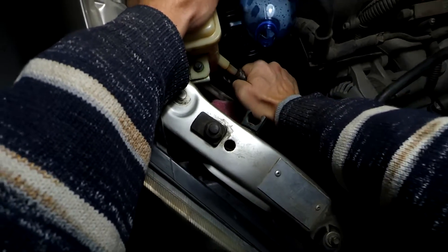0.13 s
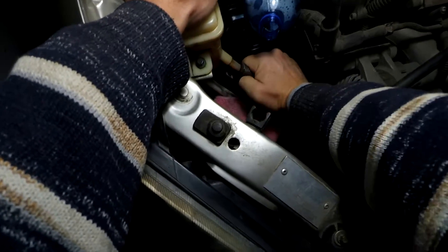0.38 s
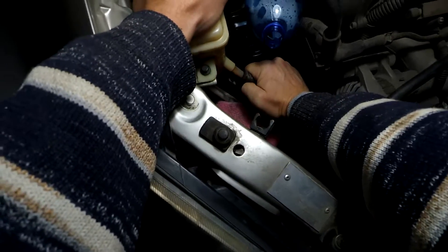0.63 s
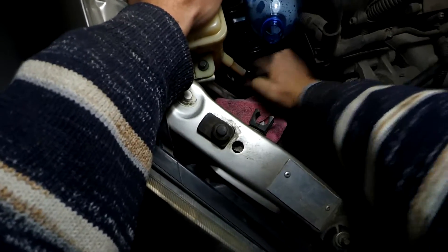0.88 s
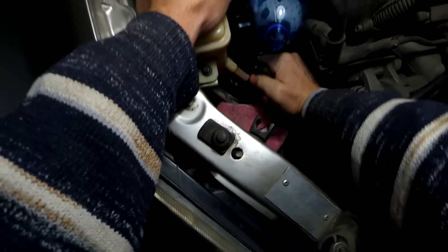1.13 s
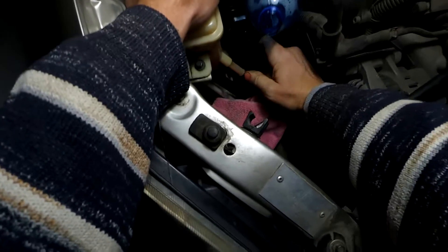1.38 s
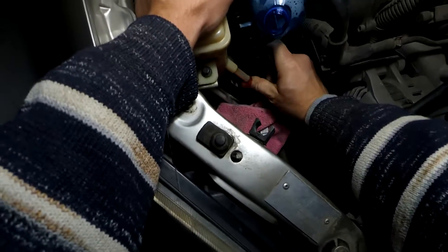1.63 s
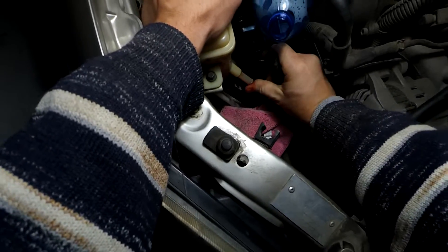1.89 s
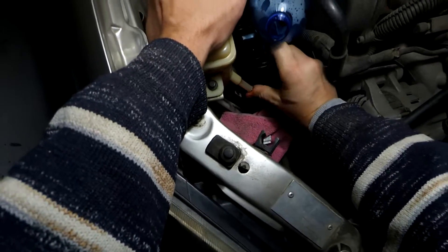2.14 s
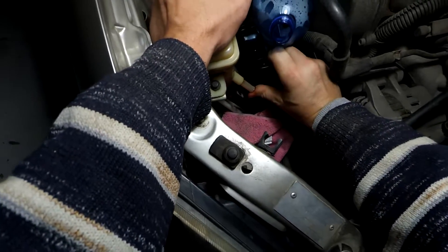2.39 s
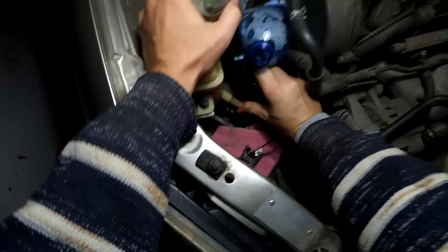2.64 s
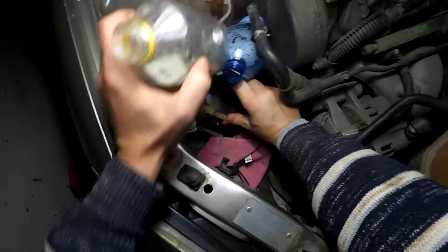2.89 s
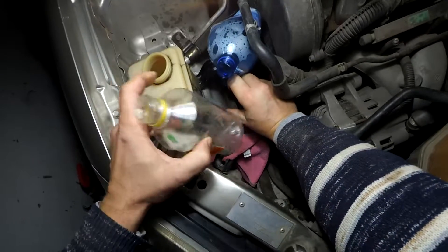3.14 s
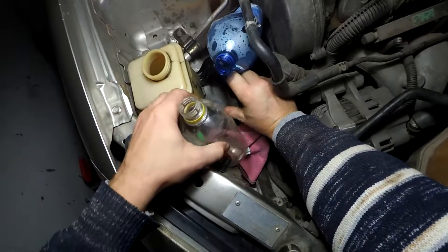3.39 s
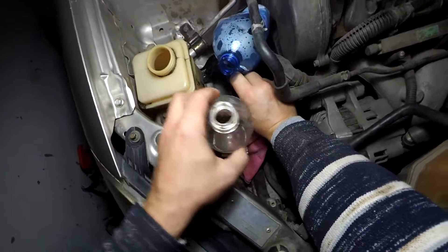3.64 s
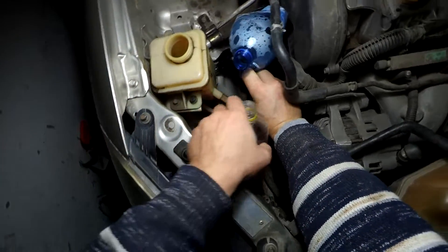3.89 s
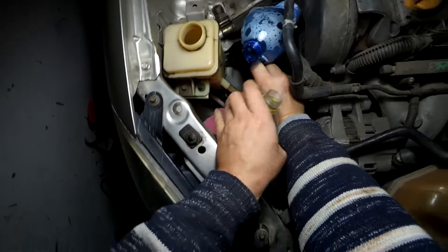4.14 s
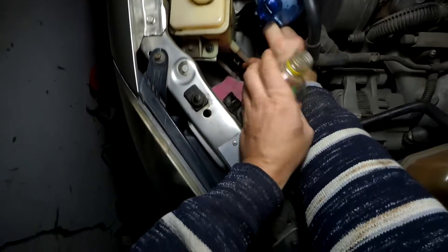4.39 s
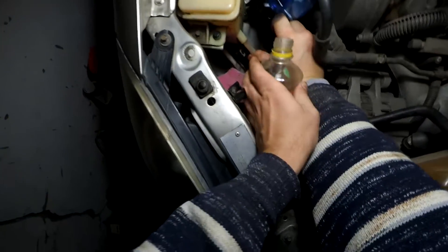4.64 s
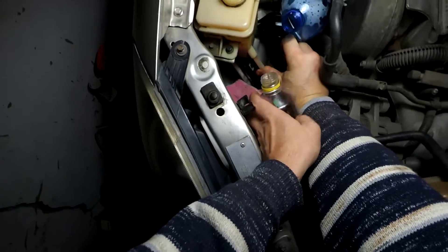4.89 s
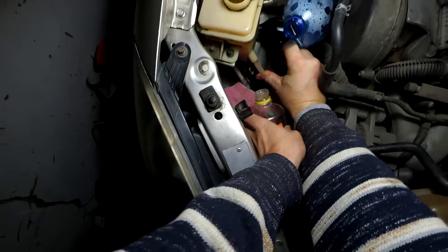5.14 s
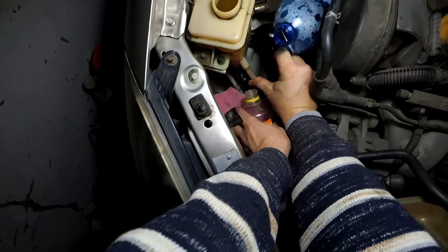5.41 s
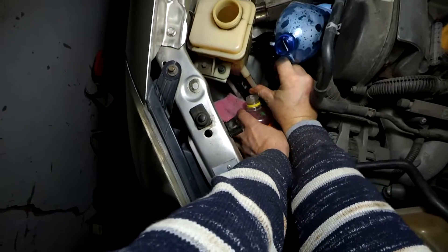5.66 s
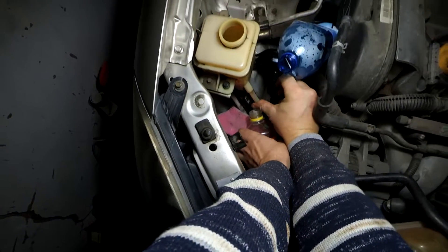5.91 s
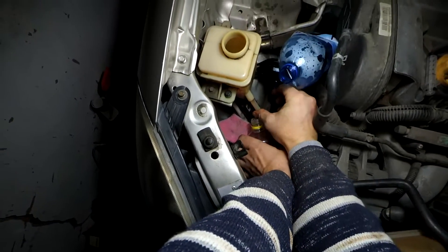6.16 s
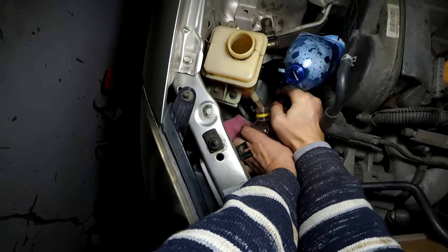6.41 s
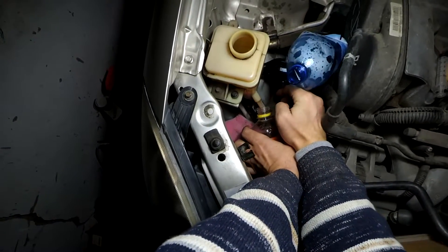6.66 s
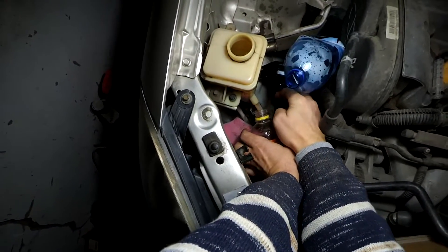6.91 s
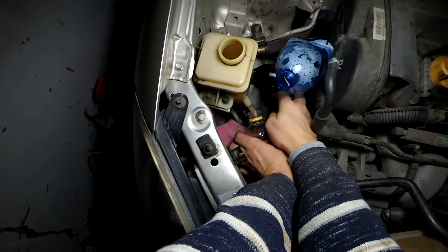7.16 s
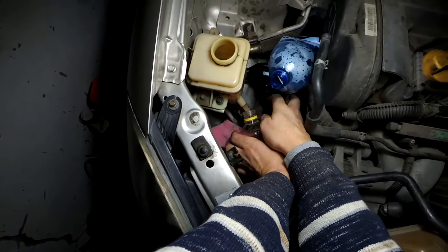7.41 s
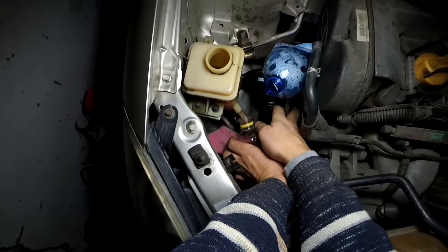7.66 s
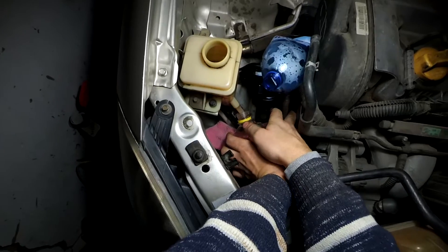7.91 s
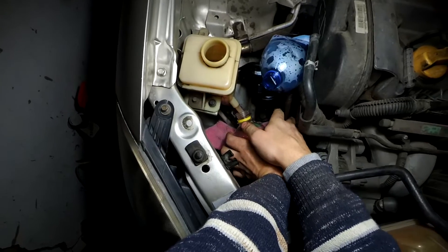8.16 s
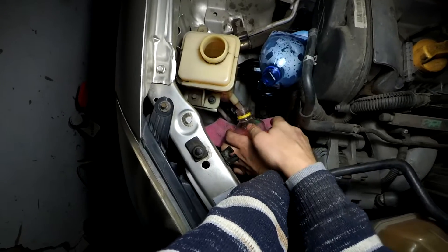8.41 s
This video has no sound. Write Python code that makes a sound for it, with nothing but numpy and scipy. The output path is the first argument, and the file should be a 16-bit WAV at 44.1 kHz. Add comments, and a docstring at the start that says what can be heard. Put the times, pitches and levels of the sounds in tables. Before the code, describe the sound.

Sparse handling noises over soft steady hiss and low camera bumps. First, muffled hand and hose knocks on hollow plastic and bodywork, with a rubbery chirp. Then an empty bottle bumps, its rim striking metal brightly, followed by scratchy wool brushes and small clacks. Wedged among engine parts, the bottle thumps hollowly, one crack standing out. Afterwards quiet taps, thin rubber squeaks and high cricket chirps, all close in a small garage.

```python
"""Knocks, clacks, rustles and squeaks from hands at work in a car's engine bay; a cricket chirps outside.
A rubber hose is pulled and pinched; an empty plastic bottle is pushed down between the parts and knocks on them.
Blows ring decaying modes and noise bands; sleeves, drags and creaks are random slips through resonances.
Squeaks are sliding tones; the cricket, hiss and sway of the body-worn camera are filtered noise."""
import sys
import numpy as np
from scipy import signal
from scipy.fft import rfft, irfft, next_fast_len
from scipy.io import wavfile
from scipy.ndimage import uniform_filter1d

SR = 44100
rng = np.random.default_rng(int(sys.argv[2]) if len(sys.argv) > 2 else 0)


def gain_from_db(level_db):
    """Convert decibel levels to linear amplitude factors (20 dB per decade)."""
    decades = np.asarray(level_db, float) / 20
    return 10 ** decades


def pcm_store(signal):
    """Save signal as 16-bit PCM."""
    levels = np.round(np.clip(np.atleast_2d(signal), -1, 1) * 32767)
    wavfile.write(sys.argv[1], SR, levels.astype(np.int16).T)


N = 376385
TIME = np.arange(N) / SR

# Hiss alike in both channels. Each row: frequency in Hz, relative density in dB per Hz.
HISS_SPECTRUM = [(100, -24), (200, 0.5), (500, -9.5), (1000, -14), (2000, -17.5), (4000, -19), (8000, -20),
                 (13000, -23.5), (16000, -23)]
# Very faint noise of opposite sign left and right. Each row: frequency in Hz, relative density in dB per Hz.
SIDE_NOISE_SPECTRUM = [(35, -28.5), (60, -1.5), (179, -37), (1100, -38), (4420, -37.5), (15500, -39)]

# Cricket chirps. Each entry: start in seconds.
CHIRP_STARTS_S = [6.59, 6.75, 6.9, 7.05, 7.25, 7.43, 7.67, 7.75, 7.92, 8.08, 8.22, 8.38]
# Wing resonances. Each row: frequency in Hz, width in Hz, gain in dB.
WING_RESONANCES = [(7750, 130, 0), (8350, 200, -4)]

# Camera on the moving body. Each row: time in seconds, sway in dB.
CAMERA_SWAY = [(0.0, -43), (0.31, -46.5), (0.43, -35), (0.81, -48), (1.02, -34.5), (1.66, -49.5),
               (2.66, -53), (3.14, -46.5), (3.61, -61), (4.06, -45.5), (5.2, -51.5), (5.37, -36.5),
               (5.561, -53), (6.15, -57), (6.37, -44.5), (6.749, -57), (7.86, -57.5), (8.53, -53.5)]
# The man shifts his weight and jolts the mount. Each row: start in seconds, length in seconds, level in dB.
JOLTS = [(1.0, 0.056, -50.5), (1.3, 0.27, -65.5), (5.3, 0.096, -47.5)]

# Decay of the engine bay and garage. Each row: frequency in Hz, t60 in seconds.
GARAGE_DECAY = [(200, 0.2), (1500, 0.2), (5000, 0.021), (12000, 0.017)]

# Knitted cloth. Each row: frequency in Hz, relative density in dB per Hz.
CLOTH_SPECTRUM = [(700, -23.5), (1200, -8.5), (2000, -6.5), (2700, -4.5), (3500, -3), (5500, -3),
                  (8000, -7.5), (11000, -13), (15500, -22)]
# A sleeve brushes past. Each row: start in seconds, length in seconds, level in dB.
BRUSHES = [(.04, 0.03, -78), (.9, 0.072, -71), (1.05, 0.089, -75.5), (1.37, 0.09, -65.5),
           (1.52, 0.061, -69), (1.78, 0.036, -67), (1.88, 0.044, -70.5), (2.04, 0.16, -67),
           (2.13, 0.035, -69), (2.63, 0.066, -66.5), (2.76, 0.029, -62), (3.09, .04, -76),
           (3.33, 0.074, -63), (3.5, 0.049, -64), (3.63, 0.19, -61), (3.9, 0.078, -63.5),
           (4.05, 0.13, -66.5), (4.275, 0.074, -59.5), (4.36, 0.019, -70), (4.46, 0.084, -59.5),
           (4.6, 0.045, -63), (4.69, 0.11, -58), (4.9, 0.0043, -61), (5.02, 0.053, -54.5),
           (5.14, 0.081, -59), (5.33, 0.098, -67.5), (5.47, 0.16, -64), (5.68, 0.082, -64),
           (5.79, 0.08, -61.5), (6.05, 0.21, -65.5), (6.28, 0.013, -70.5), (6.35, 0.1, -67),
           (6.56, 0.31, -73), (6.92, 0.052, -66), (7.4, 0.2, -72), (7.66, 0.26, -72)]
# Hollow plastic under a drag. Each row: frequency in Hz, width in Hz of one of two passes, relative gain in dB.
RUBBED_RESONANCES = [(226, 150, -1), (327.7, 99, 1), (399, 90, -2.5), (521, 180, -3), (729, 100, -5.5),
                     (1030, 210, -9.5), (1480, 570, -14.5)]
# Fingers or hose drag over a hollow part. Each row: start in seconds, length in seconds, level in dB.
DRAGS = [(.09, 0.097, -73), (.5, 0.013, -69), (1.17, 0.0041, -56.5), (1.35, 0.05, -61), (1.43, 0.032, -57),
         (1.53, 0.024, -63), (1.81, 0.033, -65.5), (2.0, 0.13, -63.5), (2.13, 0.062, -58),
         (2.49, 0.019, -73.5), (2.64, 0.18, -68), (3.38, 0.029, -51), (3.5, 0.12, -61.5),
         (3.71, 0.094, -53.5), (3.86, 0.034, -63), (4.045, 0.039, -61.5), (4.22, 0.11, -62),
         (4.45, 0.031, -64), (4.61, 0.15, -61), (4.78, 0.1, -73), (4.86, 0.034, -51.5), (5.25, 0.14, -64.5),
         (5.53, 0.08, -70.5), (5.66, 0.038, -69), (6.12, 0.09, -65.5), (6.24, 0.33, -62), (6.7, 0.094, -66),
         (6.85, 0.12, -71), (7.15, 0.062, -71), (7.32, 0.088, -70), (7.445, 0.024, -74), (7.61, 0.36, -73)]
# A drag or creak rings one resonance. Each row: start in seconds, length in seconds, frequency in Hz,
# width in Hz of one of two passes, level in dB before gating.
CREAKS = [(0.058, 0.13, 263, 140, -55.5), (0.096, 0.13, 376, 23, -66), (0.1, 0.19, 132.4, 46, -58.5),
          (0.922, .025, 1580, 160, -56), (1.213, 0.034, 4640, 5000, -64.5), (1.217, 0.029, 7000, 340, -68),
          (1.327, 0.29, 440, 150, -62.5), (1.743, 0.096, 1510, 520, -65.5), (2.563, 0.072, 1286, 54, -65),
          (2.639, 0.11, 352, 57, -61.5), (2.89, 0.16, 364, 40, -63), (3.269, 0.0097, 4330, 420, -59),
          (3.37, 0.33, 226, 7.4, -63.5), (3.485, 0.47, 2700, 310, -72), (4.853, .024, 4370, 3800, -54),
          (4.876, 0.022, 8550, 7000, -57), (6.245, 0.087, 1460, 340, -59), (7.87, 0.086, 268.5, 17, -65.5),
          (7.988, 0.09, 277, 47, -67), (8.193, 0.011, 2340, 330, -66), (8.196, 0.0065, 5250, 1200, -66.5)]
# Thin squeaks of rubber that sag. Each row: start in seconds, length in seconds, first Hz, last Hz,
# median peak level in dB.
SQUEAKS = [(1.217, .026, 1650, 1300, -54), (1.238, .034, 1450, 1300, -63), (7.64, .14, 2450, 2300, -77),
           (7.8, .29, 2500, 2250, -76)]

# Heavier blows shake the whole car front. Each row: start in seconds, gain in dB.
THUDS = [(0.976, -40), (2.161, -49), (2.808, -45), (5.976, -48)]
# Lowest bodywork modes. Each row: frequency in Hz, gain in dB, t60 in seconds.
CAR_FRONT_MODES = [(89, 2, 0.32), (132.5, 4.5, 0.096)]

# A nail or hard edge snaps over a rib. Each row: start in seconds, level in dB over the first 20 ms.
SNAPS = [(1.329, -70.5), (2.109, -51.5), (2.596, -62), (2.805, -55), (8.131, -69)]
# Treble band of a snap. Each row: frequency in Hz, width in Hz of one of two passes, gain in dB.
SNAP_BAND = [(8400, 4200, 0)]

# Blows: hand or hose on reservoir and bodywork; bottle shoulder clacking and skidding on a hose clamp;
# bottle's hard rim on sheet metal; bottle on engine parts.
# Each row: start in seconds, then wall, hollow (panel or air cavity), knock and crack levels in dB over 20 ms.
BAY_HITS = [(0.491, -72, -76, -66, -86), (0.821, -98, -61.5, -94, -98), (0.933, -56.5, -62, -46, -57.5),
            (0.975, -50, -42, -34, -50), (1.158, -68.5, -72, -54, -71), (1.345, -67, -64, -68, -88),
            (1.431, -65, -81, -78, -67.5), (1.563, -72, -68.5, -61, -68), (2.11, -67, -61, -58, -65.5),
            (2.297, -95, -72, -65.5, -84), (2.596, -62.5, -89, -77, -67), (2.666, -60, -66.5, -61, -63),
            (8.372, -62, -52.5, -37.5, -69)]
CLAMP_HITS = [(4.042, -54.5, -86, -54, -53), (4.06, -58, -85, -54.5, -71), (4.8745, -44, -46, -44.5, -39),
              (4.884, -55, -57, -53, -46)]
METAL_HITS = [(3.155, -32.5, -45.5, -37, -35.5), (3.176, -55, -59.5, -61, -51.5),
              (3.194, -52.5, -48, -39.5, -46.5), (5.978, -39.5, -46.5, -46, -34.5)]
BOTTLE_HITS = [(2.802, -46, -41, -37.5, -56), (2.811, -101, -63, -52, -57.5), (2.822, -59, -40, -66, -65),
               (2.896, -45, -45, -43.5, -51.5), (3.13, -60, -52.5, -50.5, -55),
               (3.36, -52, -51.5, -55, -59.5), (4.226, -69, -82, -61, -67), (4.276, -57.5, -82, -61, -55),
               (4.352, -66, -75, -67, -55.5), (4.386, -65.5, -68, -86, -60),
               (4.851, -69, -50.5, -51.5, -63), (5.05, -46.5, -28, -38.5, -55),
               (5.711, -36, -37.5, -40, -55.5), (5.805, -40, -43.5, -49, -57.5),
               (5.915, -66.5, -57, -54.5, -85), (6.299, -73, -66, -79, -63.5),
               (6.387, -35, -39, -40.5, -50), (6.441, -31.5, -32, -21.5, -31),
               (6.647, -60.5, -53, -55, -93), (7.152, -71.5, -55, -60.5, -86.5),
               (7.447, -64.5, -57, -62.5, -86)]

# Air in the bottle, choked while it rests on the reservoir or is gripped, lower and more damped as it sinks
# between the parts. Each row: time in seconds, frequency in Hz, t60 in seconds.
BOTTLE_AIR = [(2.83, 178, 0.028), (2.89, 226.7, 0.45), (3.1, 224, 0.055), (4.899, 228, 0.11),
              (5.04, 226, 0.36), (5.702, 222, 0.17), (6.4, 220.6, 0.15), (7.451, 203, 0.18)]
# Low modes. Each row: frequency in Hz, relative gain in dB, t60 in seconds.
BAY_PANEL_MODE = [(185, 0, 0.41)]
BAY_KNOCK = [(272, 0, .15), (350, -1, .13), (450, -10, .08), (603, -13, .08), (950, -17, .05)]
METAL_KNOCK = [(410, -4, .08), (500, -3, .09), (560, -1, .1), (610, 0, .13), (670, 0, .11), (740, -2, .09)]
BOTTLE_KNOCK = [(387, -13, 0.2), (419, -4.5, 0.047), (469, 4, 0.03), (608, -21.5, 0.22)]

# Thin walls have too many modes to tell apart; they crowd in bands, listed for wall, crack and tick.
# Each row: frequency in Hz, width in Hz of one of two passes, relative gain in dB before the passes.
BAY_BANDS = [
    [(840, 280, 0.42), (1266, 2400, 1.78), (2180, 2940, 0.61)],
    [(2700, 1760, -2), (3900, 4140, -0.85), (5560, 3920, -3)],
    [(7240, 18000, 4), (11800, 1100, -3.4)],
]
CLAMP_BANDS = [
    [(790, 440, -1), (1730, 610, -1.3)],
    [(2260, 620, -0.5), (3540, 700, -3.5)],
    [(5800, 3400, 0)],
]
METAL_BANDS = [
    [(900, 400, -2), (1390, 500, 0), (1750, 400, -4)],
    [(2150, 600, 0), (3200, 700, 0), (3950, 700, -3)],
    [(5300, 1400, 0), (8000, 4000, -5), (11000, 5000, -8)],
]
BOTTLE_BANDS = [
    [(784, 180, 5.5), (1456, 520, 8.5), (1100, 830, 3), (2080, 500, -2), (2750, 500, -0.5)],
    [(3280, 5400, 4), (3860, 2200, 8), (5500, 220, -5)],
    [(6760, 2800, -1), (10560, 3200, -21)],
]
# Modes that stand out of the crowd, listed for wall, crack and tick.
# Each row: frequency in Hz, gain in dB over the crowd, t60 in seconds.
BAY_CLEAR = [
    [(1317, -14, 0.033), (1640, -10.5, 0.034)],
    [],
    [],
]
CLAMP_CLEAR = [
    [],
    [(2225, -1, 0.057), (2380, 0, 0.032)],
    [],
]
METAL_CLEAR = [
    [(1000, -2, .07), (1389, 0, .06), (1700, -3, .07)],
    [(2060, 3, .04), (3200, 5, .025), (4100, -4, .03)],
    [(5320, 0, .03)],
]
BOTTLE_CLEAR = [
    [(810, 5.5, 0.06), (923, -1, 0.05), (1228, 0.5, 0.019), (1523, -1.5, 0.034)],
    [(2394, -5.5, 0.021), (3566, 0, 0.024), (4070, -1, 0.02)],
    [],
]
# Two-part decay of wall, crack and tick. Each row: first t60 in seconds, second t60 in seconds,
# second part in dB over the first.
BAY_FADE = [(0.054, 0.51, -19), (0.076, 0.12, -10), (0.0078, 0.069, 4)]
CLAMP_FADE = [(.06, 0.19, -5), (0.024, 0.13, -9), (0.076, .1, -8)]
METAL_FADE = [(0.032, 0.28, -15), (0.051, 0.11, -8), (0.058, 0.13, -17.5)]
BOTTLE_FADE = [(0.09, 0.08, 1.5), (0.014, 0.14, -10), (0.0048, 0.17, -28.5)]
# The tick follows the crack and how hard the wall is hit. Entries: dB over crack, dB per dB of wall over crack.
BAY_TICK = (-1.5, -0.82)
CLAMP_TICK = (-12, .1)
METAL_TICK = (0, 1.83)
BOTTLE_TICK = (-6, -0.37)


def level(x, db):
    """Scale to an rms level."""
    return x * gain_from_db(db) / np.sqrt(np.mean(x ** 2))


def shaped(x, gain):
    """Filter by a gain that is a function of frequency."""
    size = next_fast_len(len(x))
    hz = np.maximum(np.arange(size // 2 + 1) * SR / size, 1)
    return irfft(rfft(x, size) * gain(hz), size)[:len(x)]


def points(table):
    """Gain through (Hz, dB) points."""
    hz, db = np.transpose(table)
    return lambda f: gain_from_db(np.interp(np.log(f), np.log(hz), db, left=-90))


def resonances(table):
    """Gain of (Hz, width Hz, dB) resonances side by side, with alternating sign."""
    return lambda f: sum(gain_from_db(db) * 1j * f * w / (hz ** 2 - f ** 2 + 1j * f * w) * (-1) ** k
                         for k, (hz, w, db) in enumerate(table))


def gate(start_s, length_s, edge_s):
    """Gain that opens and closes smoothly."""
    inside_s = np.minimum(TIME - start_s, start_s + length_s - TIME)
    return np.clip(inside_s / edge_s, 0, 1) ** 2


def grains(per_s, spread_db):
    """Random slips of fibre or skin, most of them small, a few large."""
    happens = rng.random(N) < per_s / SR
    size = gain_from_db(spread_db * rng.exponential(size=N))
    return happens * size * rng.standard_normal(N)


def walk(rate_hz):
    """Smoothed random wander of spread 1, at a given rate."""
    hold = int(SR / rate_hz)
    steps = np.repeat(rng.standard_normal(N // hold + 1), hold)
    return level(uniform_filter1d(steps, hold)[:N], 0)


def strokes(rows, rise_db_per_s, fall_db_per_s):
    """Gain of overlapping movements: each swells up to its start, holds for its length, then fades."""
    s, length_s, db = np.transpose(rows)[:, :, None]
    t = TIME[::64]
    db = db - rise_db_per_s * np.maximum(s - t, 0) - fall_db_per_s * np.maximum(t - s - length_s, 0)
    return np.interp(TIME, t, np.sqrt(np.sum(gain_from_db(db) ** 2, axis=0)))


def patchy(x, bands, patchy_db, rate_hz, order):
    """Contact wanders, so each band swells and fades on its own; a higher order is a steeper resonance."""
    out = 0
    for hz, width_hz, db in bands:
        gain = resonances([(hz, width_hz, 0)])
        band = shaped(x, lambda f: gain(f) ** order)
        out = out + band * gain_from_db(db + patchy_db * walk(rate_hz))
    return level(out, 0)


def ring(modes, t, scatter_db, detune, push_s, rattle_db=0):
    """Decaying modes share each blow's force anew after a soft push; loose contact makes them stutter."""
    hz, db, t60_s = np.transpose(modes)[:, :, None]
    luck = rng.standard_normal((2, len(modes), 1))
    knots = t[::SR // 150]
    stutter = np.array([np.interp(t, knots, rng.standard_normal(len(knots))) for _ in modes])
    stutter = stutter * np.clip(t / .015, 0, 1)
    gain_db = db + scatter_db * luck[0] + rattle_db * stutter - 60 * t / t60_s
    rings = np.sin(2 * np.pi * hz * (1 + detune * luck[1]) * t) * gain_from_db(gain_db)
    return rings.sum(0) * (1 - np.exp(-t / push_s))


def crowd(band, fade, t):
    """Crowded modes of one band after a blow: noise with two decays added."""
    gain = resonances(band)
    first_t60_s, second_t60_s, second_db = fade
    noise = level(shaped(rng.standard_normal(len(t)), lambda f: gain(f) ** 2), 0)
    decay = gain_from_db(-60 * t / first_t60_s) + gain_from_db(second_db - 60 * t / second_t60_s)
    return noise * decay * np.clip(t / 0.00033, 0, 1)


def add(out, s, part, db):
    """Lay a sound down at time s; dB is its level over the first 20 ms."""
    at = int(s * SR)
    out[at:at + len(part)] += gain_from_db(db) * part / np.std(part[:SR // 50])


def hiss():
    """Steady noise alike in both channels."""
    return level(shaped(rng.standard_normal(N), points(HISS_SPECTRUM)), -70)


def side_noise():
    """A very faint noise of opposite sign left and right, strongest near 60 Hz."""
    side = level(shaped(rng.standard_normal(N), points(SIDE_NOISE_SPECTRUM)), -85)
    return side * np.array([[1], [-1]])


def cricket():
    """Wing strokes ring two narrow bands, as noise gated into short chirps."""
    chirp_s, edge_s, ungated_db = .085, .012, -81
    song = level(shaped(rng.standard_normal(N), resonances(WING_RESONANCES)), ungated_db)
    return song * sum(gate(s, chirp_s, edge_s) for s in CHIRP_STARTS_S)


def camera():
    """The mount sways several times a second and passes dull bumps, more as it sways more, to the microphone."""
    s, sway_db = np.transpose(CAMERA_SWAY)
    sway_db = np.interp(TIME, s, sway_db)
    sway = shaped(rng.standard_normal(N), points([(1, -33.5), (5, 36.5), (12, 36.5), (20, 30.5), (30, -68.0)]))
    bumps = shaped(rng.standard_normal(N),
                   points([(15, -23.5), (25, 4.5), (70, -6.5), (140, -16.0), (200, -57.5)]))
    bump_gain = gain_from_db(-49.5 + 0.25 * sway_db) + strokes(JOLTS, rise_db_per_s=133, fall_db_per_s=99)
    return level(sway, 0) * gain_from_db(sway_db) + level(bumps, 0) * bump_gain


def garage(x):
    """Engine bay and walls answer with a short diffuse tail that loses its treble first."""
    t, tail = np.arange(SR // 2) / SR, 0
    hz_points, t60_points_s = np.transpose(GARAGE_DECAY)
    for hz in 125 * 2 ** np.arange(0, 7, .5):
        band = shaped(rng.standard_normal(len(t)), resonances([(hz, hz / 3, 0)]))
        t60_s = np.interp(np.log(hz), np.log(hz_points), t60_points_s)
        tail = tail + band * gain_from_db(-60 * t / t60_s)
    tail = tail * np.clip(t / 0.0012, 0, 1)
    tail = tail / np.sqrt(np.sum(tail ** 2))
    return gain_from_db(-15.5) * signal.fftconvolve(x, tail)[:N]


def hands():
    """Wool brushes in quick scratchy strokes; fingers and hose drag over hollow plastic and make it hum."""
    fibres = grains(per_s=11000, spread_db=2.3)
    skin = grains(per_s=1100, spread_db=1.8)
    weave = [(hz, hz / 8, 0) for hz in 1000 * 2 ** np.arange(0, 4, .25)]
    cloth = patchy(shaped(fibres, points(CLOTH_SPECTRUM)), weave, patchy_db=3.0, rate_hz=28, order=1)
    cloth = cloth * gain_from_db(1.1 * walk(60))
    skin = shaped(skin, points([(100, -20), (200, 0), (1500, 0), (4000, -25)]))
    rub = patchy(skin, RUBBED_RESONANCES, patchy_db=2.4, rate_hz=30, order=2)
    brushed = cloth * strokes(BRUSHES, rise_db_per_s=223, fall_db_per_s=174)
    dragged = rub * strokes(DRAGS, rise_db_per_s=268, fall_db_per_s=134.5)
    return brushed + dragged


def creaks():
    """Quick stick and slip of rubber or skin: random slips through one resonance, twice."""
    slips, out = grains(per_s=9000, spread_db=2.2), 0
    for s, length_s, hz, width_hz, db in CREAKS:
        gain = resonances([(hz, width_hz, 0)])
        creak = level(shaped(slips, lambda f: gain(f) ** 2), db)
        out = out + creak * gate(s, length_s, min(length_s / 4, .03)) ** .5
    return out


def squeak():
    """Wavering tones slide down while the hose is eased; quick ones are rougher."""
    out = 0
    for s, length_s, first_hz, last_hz, db in SQUEAKS:
        hz = np.interp(TIME, [s, s + length_s], [first_hz, last_hz])
        hz = hz * (1 + .012 / np.sqrt(length_s) * walk(350))
        tone = np.sin(2 * np.pi * np.cumsum(hz) / SR)
        out = out + gain_from_db(db + 4.0 * walk(150)) * tone * gate(s, length_s, length_s / 6)
    return out


def thuds():
    """A push into the lowest modes of the bodywork."""
    out, t = np.zeros(N + SR), np.arange(SR // 2) / SR
    for s, db in THUDS:
        at = int(s * SR)
        thud = ring(CAR_FRONT_MODES, t, scatter_db=0.23, detune=0.014, push_s=0.00058)
        out[at:at + len(t)] += gain_from_db(db) * thud
    return out[:N]


def snaps():
    """Only a high, short-lived band of the plastic answers."""
    out, t = np.zeros(N + SR), np.arange(SR // 2) / SR
    for s, db in SNAPS:
        add(out, s, crowd(SNAP_BAND, BAY_FADE[-1], t), db)
    return out[:N]


def strike(hits, hollow, knock, bands, clear, fades, tick):
    """A blow rings the low modes and sets off the crowded bands, with any clear modes on top."""
    out, t = np.zeros(N + SR), np.arange(SR // 2) / SR
    over_crack_db, db_per_db = tick
    for s, wall_db, hollow_db, knock_db, crack_db in hits:
        tick_db = crack_db + over_crack_db + db_per_db * (wall_db - crack_db)
        add(out, s, ring(hollow(s), t, scatter_db=2.0, detune=.004, push_s=.003), hollow_db)
        add(out, s, ring(knock, t, scatter_db=2.0, detune=.02, push_s=.001, rattle_db=4.0), knock_db)
        for band, modes, fade, db in zip(bands, clear, fades, (wall_db, crack_db, tick_db)):
            part = crowd(band, fade, t)
            if modes:
                part = part + ring(modes, t, scatter_db=3.0, detune=.012, push_s=.0004, rattle_db=5.0)
            add(out, s, part, db)
    return out[:N]


def bay_blows():
    """Hand or hose rings one hollow panel mode, low knocks and wall bands of reservoir and bodywork."""
    return strike(BAY_HITS, lambda s: BAY_PANEL_MODE, BAY_KNOCK, BAY_BANDS, BAY_CLEAR, BAY_FADE, BAY_TICK)


def cavity(s):
    """The one mode of the bottle's air at time s."""
    when_s, hz, t60_s = np.transpose(BOTTLE_AIR)
    return [(np.interp(s, when_s, hz), 0, np.interp(s, when_s, t60_s))]


def bottle_blows():
    """The bottle's air rings along with its own walls, sheet metal or a hose clamp."""
    parts = strike(BOTTLE_HITS, cavity, BOTTLE_KNOCK, BOTTLE_BANDS, BOTTLE_CLEAR, BOTTLE_FADE, BOTTLE_TICK)
    metal = strike(METAL_HITS, cavity, METAL_KNOCK, METAL_BANDS, METAL_CLEAR, METAL_FADE, METAL_TICK)
    clamp = strike(CLAMP_HITS, cavity, METAL_KNOCK, CLAMP_BANDS, CLAMP_CLEAR, CLAMP_FADE, CLAMP_TICK)
    return parts + metal + clamp


def scene():
    """All sounds reach both channels alike; a very faint added noise differs."""
    knocks = bottle_blows() + bay_blows() + snaps()
    blows = knocks + garage(knocks) + thuds()
    handling = hands() + creaks() + squeak()
    background = cricket() + camera() + hiss()
    return blows + handling + background + side_noise()


def roll_off(x):
    """The treble ends steeply here."""
    return signal.sosfilt(signal.butter(12, 16380, fs=SR, output="sos"), x)


def record(dry):
    """The top is cut; the left converter sits slightly below zero."""
    top_hz, left_offset = 15500, -.002  # offset as a fraction of full scale
    low_pass = signal.ellip(8, .2, 70, top_hz, fs=SR, output="sos")
    mix = signal.sosfilt(low_pass, dry) + np.array([[left_offset], [0]])
    return roll_off(mix)


dry = scene()
out = record(dry)
pcm_store(out)
```